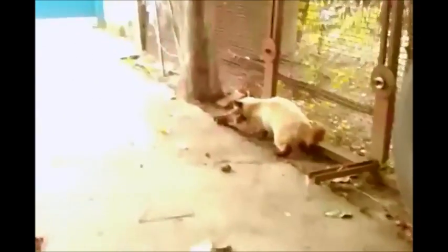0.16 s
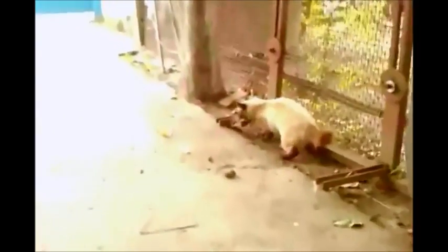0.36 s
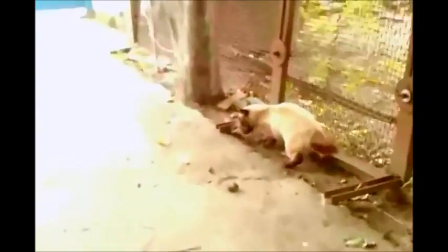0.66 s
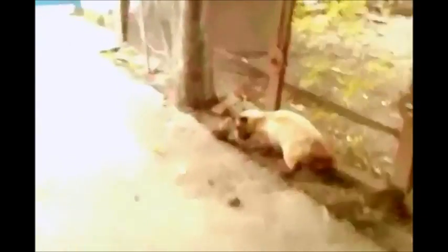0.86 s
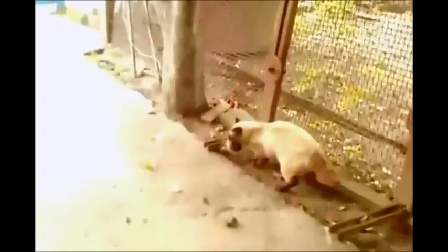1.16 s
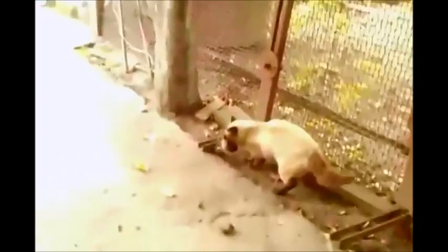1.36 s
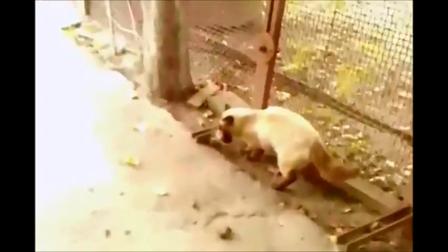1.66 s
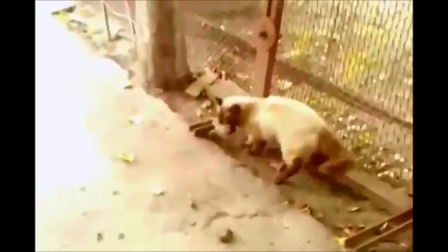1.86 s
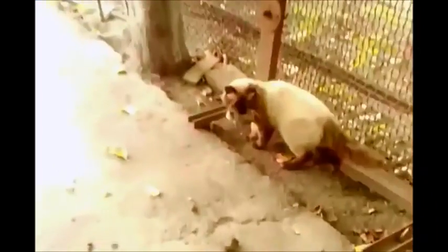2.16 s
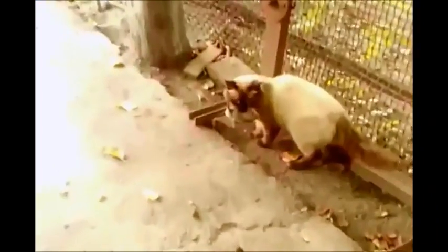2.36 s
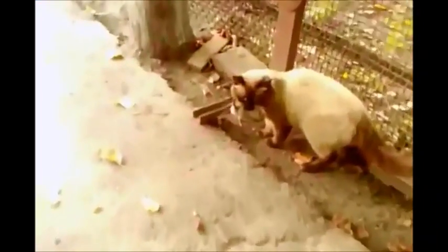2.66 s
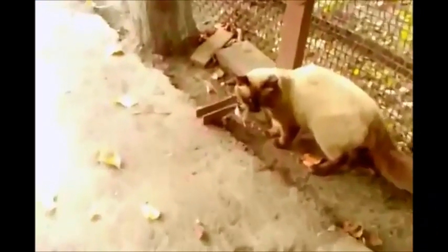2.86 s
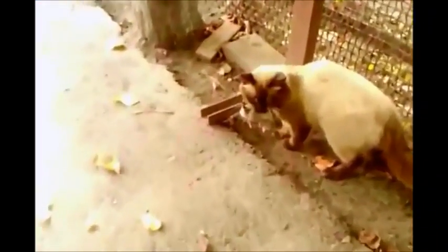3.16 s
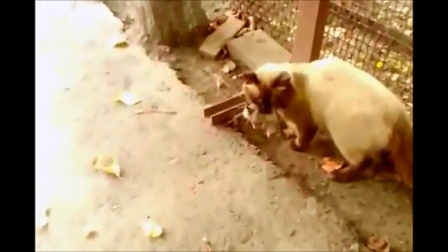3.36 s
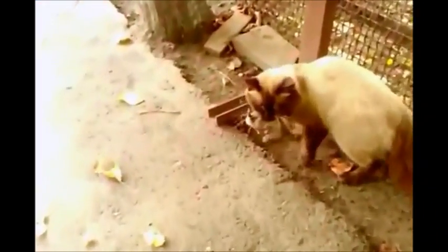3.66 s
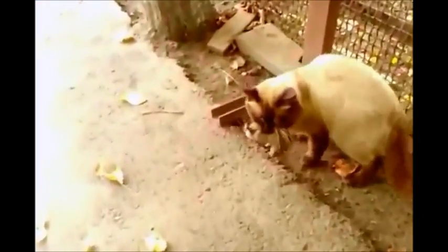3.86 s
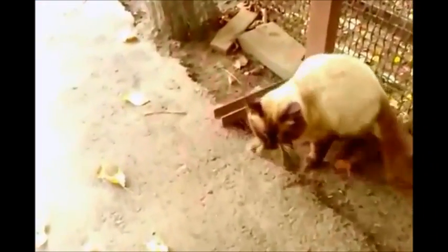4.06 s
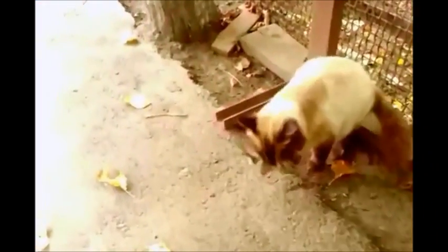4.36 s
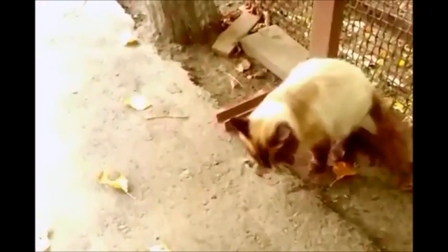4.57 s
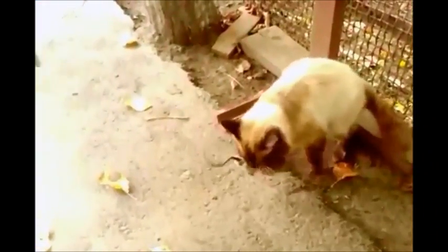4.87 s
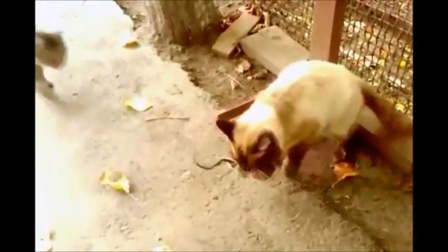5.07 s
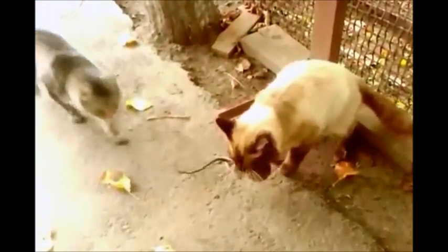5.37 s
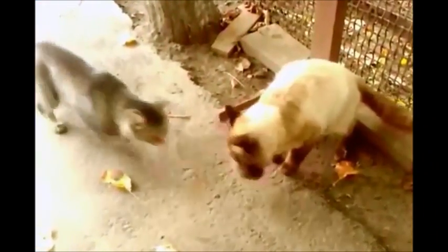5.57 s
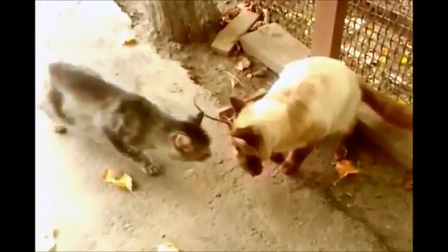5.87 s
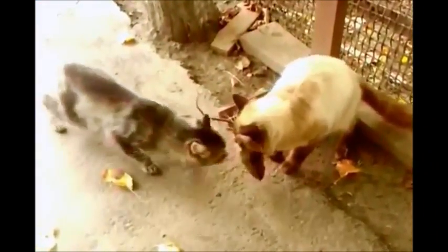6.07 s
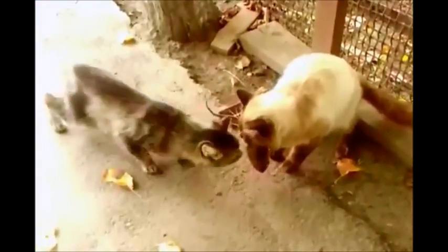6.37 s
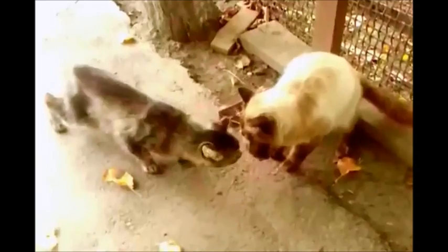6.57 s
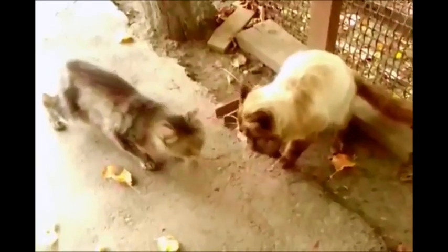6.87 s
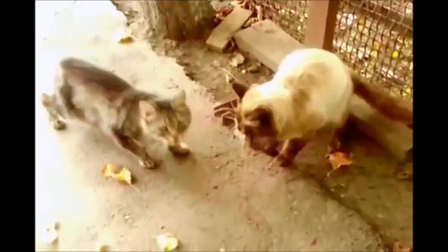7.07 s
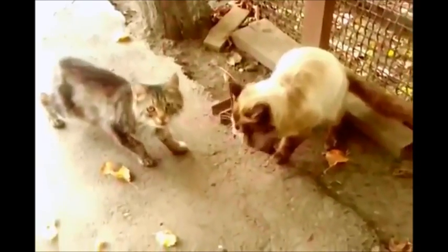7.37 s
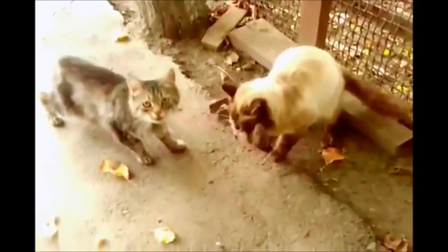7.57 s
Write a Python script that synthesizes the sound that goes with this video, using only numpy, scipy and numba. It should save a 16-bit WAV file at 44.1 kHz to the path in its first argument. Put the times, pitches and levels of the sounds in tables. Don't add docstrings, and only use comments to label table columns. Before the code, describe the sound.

A small mono camera a few metres away hears a rat squealing in a cat's jaws in a concrete yard, with a short dense echo and constant soft town hum and hiss. After a tiny peep and leaf ticks, the first hoarse, shrill squeal runs 0.1-1.0 s in joined pushes; a leaf clicks at its end. A peep leads to a weaker rasp at 1.2-1.8, then a short broken one at 2.05-2.45 and a higher, clearer one at 2.75-3.15. Low peep and faint crackle near 3.3. Strong harsh cries follow at 3.5-4.1, peaking as a sharp leaf snap lands, then 4.3-4.7 and 4.9-5.3. Two quick low peeps near 5.4 precede a thinner, weaker, whining squeal at 5.55-5.9. From 6.2 a very faint, low, wavering cat growl continues to the end beneath raspy squeals at 6.3-7.0 and 7.3-7.65, with a peep between and a crisp double leaf tick near 7.46.

```python
import sys
import numpy as np
from scipy import signal
from scipy.fft import rfft, irfft
from scipy.io import wavfile
from scipy.ndimage import uniform_filter1d
from numba import njit

SR = 44100
rng = np.random.default_rng(int(sys.argv[2]) if len(sys.argv) > 2 else 0)


def output_pcm(signal):
    pcm = np.clip(np.atleast_2d(signal).T, -1, 1) * 32767
    wavfile.write(sys.argv[1], SR, np.round(pcm).astype(np.int16))


def natural_amplitude(level_db):
    exponent = np.asarray(level_db, float) / 20
    return 10 ** exponent


N = 340452
T = np.arange(N) / SR

# (onset t/s, release t/s, early level/dB, late level/dB)
PUSHES = [(0.11, 0.239, -56, -44.5), (0.223, 0.504, -45, -46), (.475, 0.966, -43.5, -51.5),
          (1.201, 1.361, -64.5, -49), (1.343, 1.783, -48, -51.5), (2.049, 2.188, -53.5, -45.5),
          (2.18, 2.271, -44, -50), (2.317, 2.451, -49.5, -49.5), (2.742, 2.885, -46, -40.5),
          (2.862, 3.141, -41, -45), (3.518, 3.896, -43, -40), (3.888, 4.04, -40.5, -38),
          (4.036, 4.089, -34.5, -42), (4.317, 4.459, -46, -36.5), (4.442, 4.519, -37, -36),
          (4.528, 4.687, -42, -49), (4.924, 5.048, -51, -46.5), (5.052, 5.2, -45, -40),
          (5.166, 5.284, -44, -40.5), (5.537, 5.59, -49.5, -52.5), (5.604, 5.737, -49.5, -56.5),
          (5.733, 5.821, -50, -55), (5.814, 5.924, -60, -70), (6.333, 6.518, -46.5, -39.5),
          (6.504, 6.754, -41.5, -45.5), (6.742, 6.827, -44.5, -39), (6.803, 6.997, -37.5, -53),
          (7.278, 7.394, -41.5, -40.5), (7.376, 7.485, -41.5, -42.5), (7.491, 7.667, -49, -51.5)]


def squeals(pulses, air, rough):
    # (mouth f/Hz, throat f/Hz, tongue f/Hz, teeth f/Hz)
    postures = [(3710, 2040, 6300, 10700), (3950, 2150, 5730, 10450), (3867, 2100, 6300, 10400),
                (3660, 2500, 5800, 10350), (3795, 2440, 6000, 10200), (3560, 2280, 5900, 9600),
                (4000, 2380, 4100, 10100), (3280, 2570, 6900, 9100), (3100, 3420, 5850, 9950),
                (3680, 3020, 6000, 9850), (3670, 2670, 6000, 9980), (3770, 2530, 6200, 9830),
                (3860, 2400, 6200, 9370), (3720, 1890, 6050, 9960), (3810, 1900, 5300, 9800),
                (3800, 2430, 6330, 10250), (3890, 2200, 6300, 9750), (4280, 2200, 6270, 10300),
                (3750, 2400, 4900, 9580), (4400, 2830, 7100, 10440), (3960, 2170, 6700, 10500),
                (3700, 2000, 6700, 10100), (3850, 2530, 6600, 9400), (3570, 2180, 5900, 10060),
                (3750, 2030, 6350, 10030), (3960, 1950, 5250, 9900), (3660, 2500, 6250, 9850),
                (3420, 1870, 5300, 9440), (3780, 1950, 4800, 10470), (3640, 1840, 5000, 10050)]
    # (throat level/dB, palate level/dB, teeth level/dB, chest level/dB)
    openings = [(-12.5, -14, -9.5, -47), (-13.5, -7, -14, -42), (-16.5, -17.5, -12.5, -44.5),
                (-8.5, -12, -6.5, -39), (-19.5, -20, -13.5, -44), (-15, -11.5, -1.5, -43),
                (-12, -4.5, -4.5, -43.5), (-13.5, -16, -10, -44.5), (-7, -23.5, -14.5, -53),
                (-10.5, -19.5, -11.5, -46), (-5.5, -12.5, -5, -51), (1.5, -4, -7, -48),
                (-13.5, -11.5, -9, -50), (-10, -8.5, -3.5, -42), (-27, -13, -15.5, -46),
                (-6.5, -12.5, -8.5, -44), (-4, -8, -15.5, -47), (-8.5, 0, -13.5, -46),
                (-18, -14, -11, -50.5), (-5, 0.5, 1.5, -45), (6, -5.5, -1, -30.5), (3, -4, -1.5, -33.5),
                (5.5, -3, -1, -39), (-2.5, -23, -11, -39.5), (-2, -15.5, -5.5, -45.5), (-0.5, 2, -4, -41),
                (-17.5, -17.5, -14, -43.5), (-10.5, -17, -13, -50), (-5.5, -2, -8.5, -45),
                (3.5, -10.5, -17.5, -68)]
    # (f/Hz, width/Hz, level/dB)
    palate_modes = [(4740, 710, 6.5), (5723, 1030, 2.5), (7510, 670, 1.5)]
    # (share of the teeth f, width/Hz, level/dB)
    teeth_modes = [(0.882, 820, -5), (1.002, 1510, 4)]
    glide_s, lead_s = .055, 0.0087

    source = np.sqrt(1 - rough ** 3) * pulses + rough ** 1.5 * air
    effort_db = effort()
    onsets = np.array(PUSHES)[:, 0] - lead_s
    throat_db, palate_db, teeth_db, chest_db = held(onsets, openings, glide_s)
    mouth_hz, throat_hz, tongue_hz, teeth_hz = held(onsets, postures, glide_s)

    teeth_hz = teeth_hz + 20.5 * uniform_filter1d(np.clip(effort_db + 46, -25, 10), size=2000)
    mouth_hz = mouth_hz * (1 + 0.017 * walk(18))

    mouth = cavity(source, mouth_hz, 1260, count=3)
    throat = cavity(source, throat_hz, 1560, count=3)
    voice = mouth - natural_amplitude(throat_db) * throat
    throat_edge = signal.butter(N=6, Wn=1390, btype="high", fs=SR, output="sos")
    voice = signal.sosfilt(throat_edge, voice)
    voice -= band_pass(voice, 0.57 * throat_hz, 684.)

    favour = np.array([natural_amplitude(db) * np.exp(-((hz - tongue_hz) / 1500) ** 2) for hz, width, db in palate_modes])
    favour /= np.sqrt(np.sum(favour ** 2, axis=0))
    palate = np.zeros(N)
    for gain, (hz, width, db) in zip(favour, palate_modes):
        own_air = np.roll(air, int(hz))
        palate += gain * cavity(own_air + 2.4 * source, hz, width)
    voice += natural_amplitude(palate_db) * palate

    teeth = sum(natural_amplitude(db) * cavity(air, share * teeth_hz, width) for share, width, db in teeth_modes)
    voice += natural_amplitude(teeth_db) * level(teeth, 0)

    chest_gain = natural_amplitude(-.4 * np.maximum(effort_db, -75) + chest_db)
    voice += chest_gain * cavity(air, 1265, 1100)
    loudness = natural_amplitude(effort_db + .6 * walk(50))
    return voice * uniform_filter1d(loudness, int(.006 * SR))


def folds():
    # (start t/s, flap rate f/Hz, roughness 0-1)
    registers = np.array([(0, 812, .5), (.14, 812, .28), (.205, 828, .68), (1.1, 1070, .86),
                          (1.95, 930, .74), (2.31, 700, .75), (2.6, 1345, .62), (2.84, 1200, .78),
                          (3.4, 780, .85), (4.25, 730, .8), (4.85, 750, .78), (5.49, 1400, .74),
                          (5.6, 792, .62), (5.8, 730, .58), (6.1, 710, .78), (6.56, 770, .52),
                          (6.8, 785, .9), (7.1, 810, .76)])
    hz, rough = held(registers[:, 0], registers[:, 1:], glide_s=.012)
    hz = hz * (1 + .008 * walk(40))
    chance = rng.standard_normal((N // 8, 2))
    pulses, phase = flap(hz, rough, chance, .065, .13)
    sway = np.sin(2 * np.pi * np.cumsum(hz * (.36 + .02 * walk(12))) / SR)
    pulses = pulses * (1 + .9 * rough * sway)
    air = np.exp(-phase / 0.85) * rng.standard_normal(N)
    return level(pulses - pulses.mean(), 0), level(air, 0), rough


@njit
def flap(hz, rough, chance, stretch, scatter):
    pulses, phase = np.zeros(len(hz) + 1), np.empty(len(hz))
    p, cycle = 0., 0
    for i in range(len(hz)):
        step = hz[i] * np.exp(stretch * rough[i] * chance[cycle, 0]) / SR
        p += step
        if p >= 1:
            p, cycle = p - 1, cycle + 1
            size = np.exp(scatter * rough[i] * chance[cycle, 1])
            pulses[i] += size * p / step
            pulses[i + 1] += size * (1 - p / step)
        phase[i] = p
    return pulses[:-1], phase


def effort():
    # (onset t/s, release t/s, early level/dB, late level/dB)
    wheezes = [
        (3.153, 3.285, -68, -72),
        (5.322, 5.439, -63, -73),
    ]
    attack_s, attack_db, release_db_per_s = 0.032, 11, 428
    out = np.full(N, -120.)
    for onset, release, early_db, late_db in PUSHES + wheezes:
        db = np.interp(T, [onset, onset + attack_s, release], [early_db - attack_db, early_db, late_db])
        db -= release_db_per_s * np.clip(T - release, 0, None)
        out = np.where(T > onset, np.maximum(out, db), out)
    return out


def locked_tones(rough):
    # (start t/s, length/s, first f/Hz, last f/Hz, level/dB)
    tones = [(0.143, 0.51, 1600, 1700, -63.5), (.15, 0.69, 815, 860, -74), (1.28, 0.41, 1120, 1153, -69),
             (2.052, 0.18, 1010, 954, -72.5), (2.24, .12, 1560, 1680, -63.5), (2.752, .39, 2626, 2640, -59),
             (2.75, 0.37, 1313, 1314, -69), (3.6, 0.29, 1172, 1245, -68), (3.61, .47, 780, 890, -68),
             (4.38, 0.26, 690, 780, -67.5), (4.44, 0.12, 1490, 1540, -64.5),
             (5.125, 0.14, 1800, 1604, -60.5), (5.243, 0.05, 1245, 1260, -61.5),
             (5.539, 0.13, 1380, 1474, -62.5), (5.622, 0.12, 1565, 1592, -63),
             (5.642, 0.13, 785, 775, -66.5), (5.792, 0.14, 1230, 1320, -61.5),
             (6.332, 0.23, 1270, 1265, -60), (6.4, 0.44, 707, 803, -65), (6.526, 0.37, 1460, 1600, -64.5),
             (6.6, .2, 2250, 2330, -73), (7.65, 0.066, 1676, 1883, -62), (5.035, .075, 4760, 4720, -47)]
    calls = []
    for s, length, first_hz, last_hz, db in tones:
        times = (s, s + length / 2, s + length)
        pitches = (first_hz, (first_hz + last_hz) / 2, last_hz)
        calls.append(arch(times, pitches, [db], fade_db=5))
    return partials(calls, 0.071 * rough, 180, 1.5)


def in_breath_peeps():
    # (peak t/s, f/Hz, partial 1 level/dB, partial 2 level/dB, partial 3 level/dB)
    peeps = [
        (0.005, 456, -68, -67, -76),
        (1.126, 564, -58.5, -58.5, -95),
        (1.948, 551, -80, -72, -96),
        (3.27, 430, -72, -65.5, -73),
        (5.39, 436, -73.5, -70, -66.5),
        (5.443, 538, -67, -62.5, -80),
        (7.162, 519.5, -68.5, -76, -59.5),
    ]
    rise_s, fall_s, scoop = .06, 0.033, .93
    calls = []
    for s, hz, *dbs in peeps:
        calls.append(arch((s - rise_s, s, s + fall_s), (scoop * hz, hz, hz), dbs, fade_db=19))
    return partials(calls, 0.023, 120, 2.25)


def camera_port(x):
    # (f/Hz, width/Hz, level/dB)
    port = [(3375, 61, -20), (4016, 82, -6)]
    return x + sum(natural_amplitude(db) * band_pass(x, np.full(N, 1. * hz), 1. * width) for hz, width, db in port)


def leaves():
    # (t/s, peak level/dB, colour f/Hz)
    ticks = [(0.043, -54, 5250), (0.0608, -54, 5570), (0.96, -44.5, 4710), (1.9107, -62, 5370),
             (2.6607, -57.5, 4720), (3.316, -51, 4760), (3.366, -57.5, 4800), (3.4236, -60.5, 5150),
             (4.085, -34, 4000), (7.453, -34, 5000), (7.475, -34.5, 4900)]
    out, t = np.zeros(N + 2000), np.arange(2000) / SR
    for s, db, hz in ticks:
        crackle = rng.standard_normal(len(t)) * np.exp(-t / 0.0033)
        burst = band_pass(crackle, np.full(len(t), 1. * hz), 2000.0)
        out[int(s * SR):][:len(t)] += natural_amplitude(db) * burst / np.abs(burst).max()
    return out[:N]


def echoes(x, t60_s, db):
    t = np.arange(8000) / SR
    fade = np.exp(-np.log(1000) * t / t60_s)
    tail = rng.standard_normal(len(t)) * fade * (t > .003)
    tail /= np.sqrt(np.sum(tail ** 2))
    return x + natural_amplitude(db) * signal.fftconvolve(x, tail)[:N]


def cat_growl():
    growl_db = (-83.5, -89, -85)
    start_s, swell_s, start_hz, end_hz = 6.17, 0.103, 143, 132
    growl = [(start_s, start_hz, *(np.array(growl_db) - 9)),
             (start_s + swell_s, start_hz, *growl_db),
             (N / SR, end_hz, *growl_db)]
    return partials([growl], .012, 20, 1.8)


def yard():
    # (f/Hz, level/dB)
    curve = np.array([(20, -21), (50, -20), (65, -10), (85, -5.5), (105, -8.5), (150, -13), (260, -7),
                      (420, -4), (900, -4), (1300, -8), (1900, -9), (5500, -11.5), (7000, -16),
                      (11100, -17)])
    hz = np.arange(N // 2 + 1) * SR / N + 1
    colour = natural_amplitude(np.interp(np.log(hz), np.log(curve[:, 0]), curve[:, 1]))
    low = 1 / (1 + (hz / 900) ** 2)
    hum = irfft(rfft(rng.standard_normal(N)) * colour * np.sqrt(low), N)
    hiss = irfft(rfft(rng.standard_normal(N)) * colour * np.sqrt(1 - low), N)
    return level(hum * natural_amplitude(0.68 * walk(12.0)) + hiss * natural_amplitude(1.0 * walk(4)), -70.5)


def partials(calls, waver, rate, flutter_db):
    out, drift = np.zeros(N), 1 + waver * walk(rate)
    flutter = [flutter_db * walk(rate) for _ in range(3)]
    for call in calls:
        span = slice(int(call[0][0] * SR), int(call[-1][0] * SR))
        s, *columns = np.transpose(call)
        hz, *dbs = (np.interp(T[span], s, c) for c in columns)
        turn = 2 * np.pi * np.cumsum(hz * drift[span]) / SR
        tone = sum(natural_amplitude(db + flutter[k][span]) * np.sin((k + 1) * turn) for k, db in enumerate(dbs))
        out[span] += np.sqrt(2) * tone * gate(s[0], s[-1], 0.0027)[span]
    return out


def arch(s, hz, dbs, fade_db):
    return [(max(t, 0), f, *(np.array(dbs) - g)) for t, f, g in zip(s, hz, (fade_db, 0, fade_db))]


def gate(t0, t1, edge):
    return np.clip(np.minimum(T - t0, t1 - T) / edge, 0, 1)


def held(s, rows, glide_s):
    steps = np.array(rows, float)[np.clip(np.searchsorted(s, T) - 1, 0, None)]
    return uniform_filter1d(steps, int(glide_s * SR), axis=0).T


def cavity(x, hz, width_hz, count=2):
    hz = np.clip(hz + np.zeros(N), 100, SR / 3)
    for _ in range(count):
        x = band_pass(x, hz, 1. * width_hz)
    return level(x, 0) * natural_amplitude(.5 * walk(35))


@njit
def band_pass(x, hz, width):
    y, band, low = np.empty(len(x)), 0., 0.
    for i in range(len(x)):
        g, k = np.tan(np.pi * hz[i] / SR), width / hz[i]
        v = (band + g * (x[i] - low)) / (1 + g * (g + k))
        band, low, y[i] = 2 * v - band, low + 2 * g * v, k * v
    return y


def walk(rate):
    k = int(SR / rate)
    steps = np.repeat(rng.standard_normal(N // k + 1), k)
    return 1.4 * uniform_filter1d(uniform_filter1d(steps, k), k)[:N]


def level(x, db):
    return x * natural_amplitude(db) / np.sqrt(np.mean(x ** 2))


def scene():
    pulses, air, rough = folds()
    rat = squeals(pulses, air, rough) + in_breath_peeps() + locked_tones(rough)
    rat = camera_port(rat)
    mono = echoes(rat + leaves(), 0.15, -5.5) + cat_growl() + yard()
    return np.array([mono, mono])


def band_limit(x):
    return signal.sosfilt(signal.butter(12, 11330, fs=SR, output="sos"), x)


def record(dry):
    top_cut = signal.ellip(12, .3, 75, 11020, fs=SR, output="sos")
    return band_limit(signal.sosfilt(top_cut, dry))


dry = scene()
out = record(dry)
output_pcm(out)
```